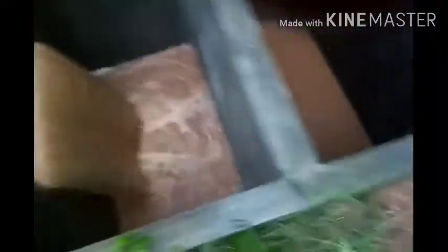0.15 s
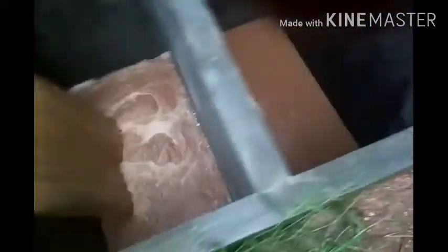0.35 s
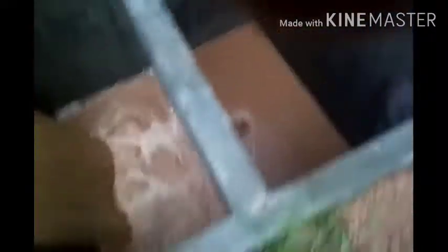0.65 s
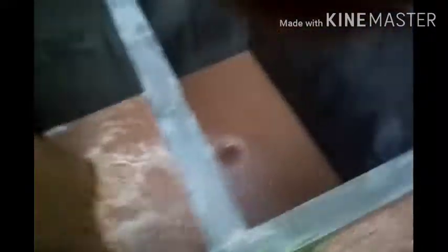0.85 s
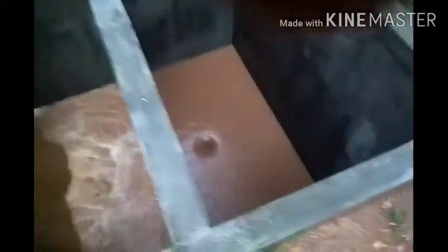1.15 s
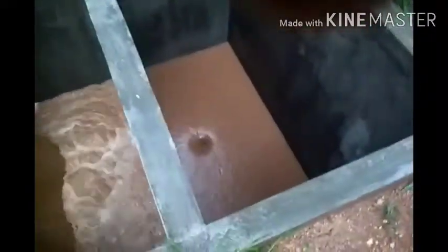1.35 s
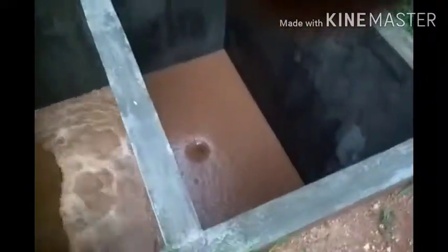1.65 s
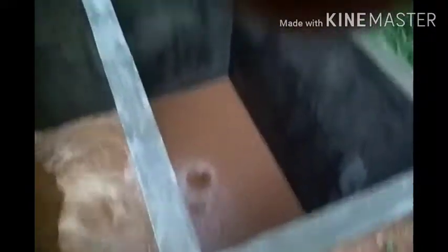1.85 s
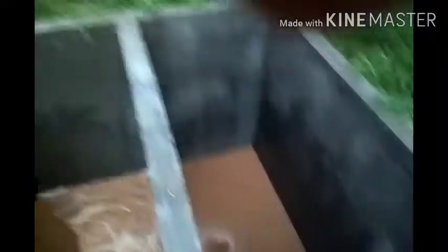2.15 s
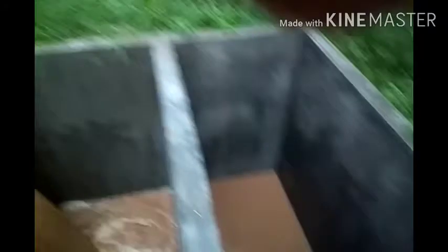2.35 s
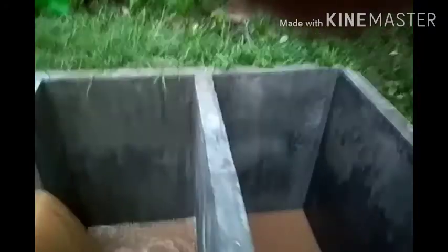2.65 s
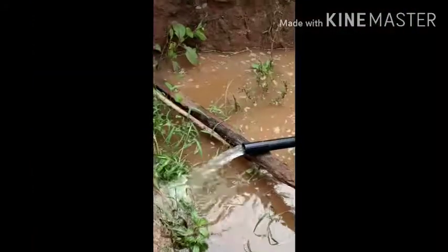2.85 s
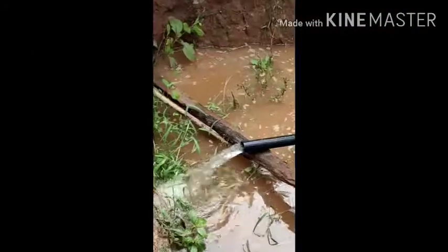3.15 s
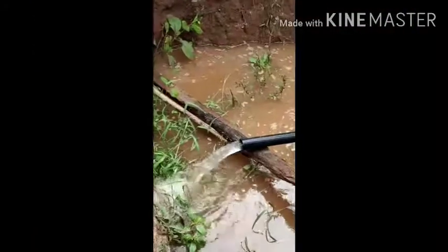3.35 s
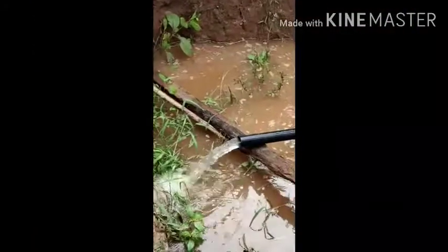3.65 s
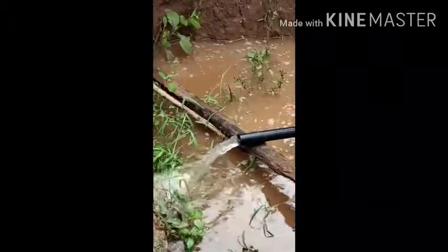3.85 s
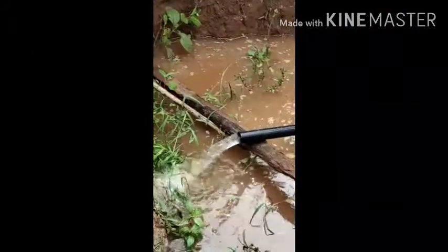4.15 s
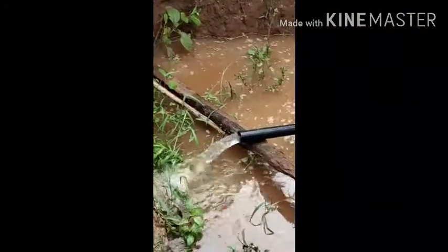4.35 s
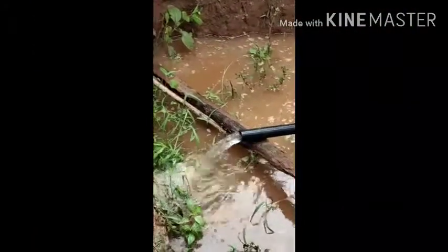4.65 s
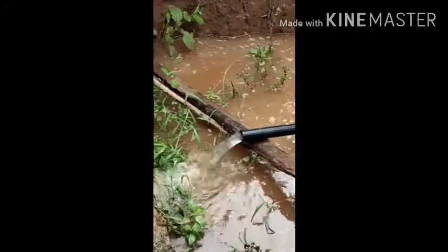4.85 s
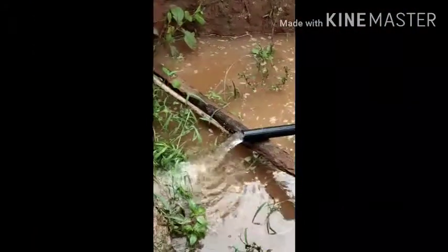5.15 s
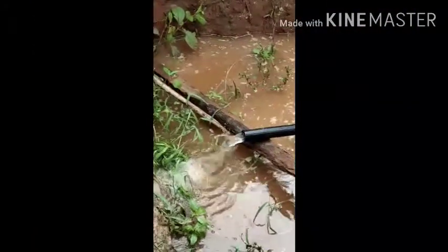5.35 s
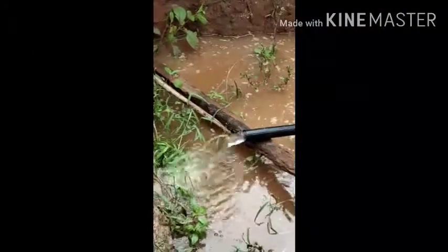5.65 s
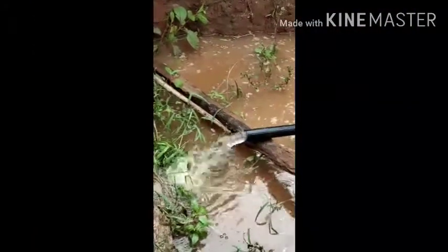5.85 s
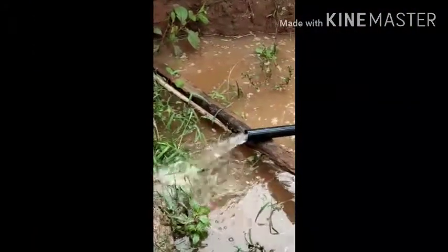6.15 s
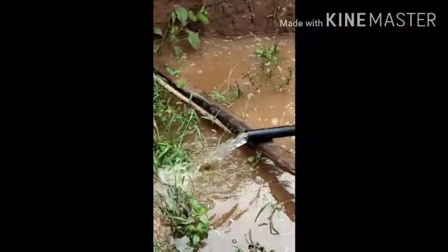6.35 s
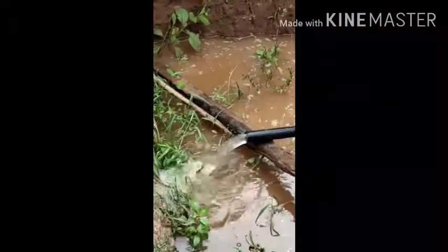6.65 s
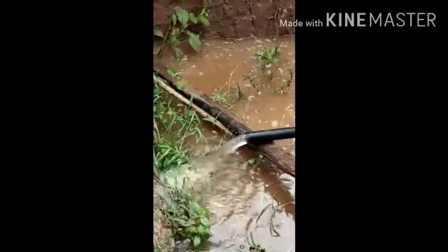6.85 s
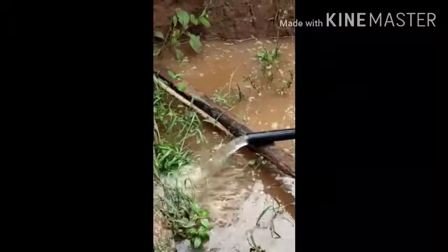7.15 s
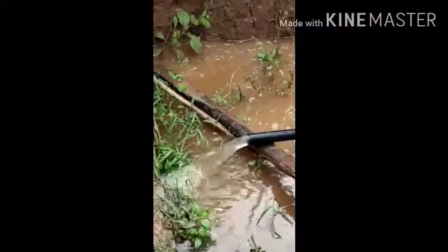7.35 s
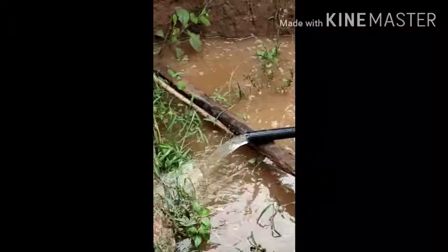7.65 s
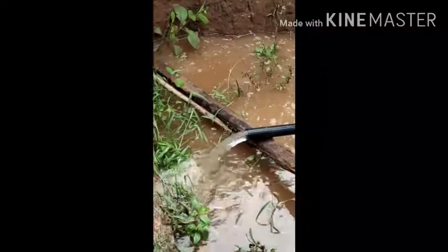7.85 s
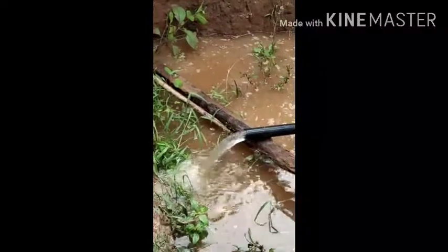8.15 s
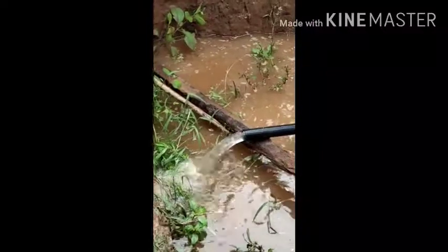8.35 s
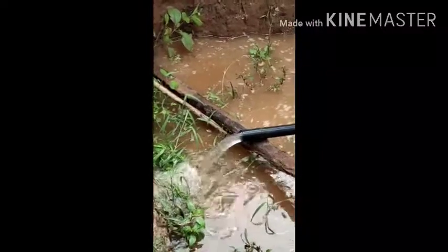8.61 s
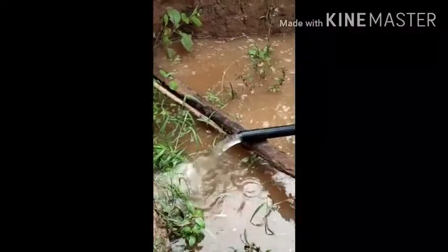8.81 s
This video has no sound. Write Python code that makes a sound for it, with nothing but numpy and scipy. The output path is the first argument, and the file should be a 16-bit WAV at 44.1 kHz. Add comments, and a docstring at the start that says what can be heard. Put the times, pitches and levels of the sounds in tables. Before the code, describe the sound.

Water gushes into a concrete tank, churning with dense bubbles, hollow gulps and wet slaps under a bright hiss of spray. A low boom swells briefly beneath it. After about three seconds the sound changes to a much quieter pipe pouring a thin, uneven stream into a puddle in an open ditch, babbling and spattering with small plops and a few deep gulps. The water sounds close throughout.

```python
"""First, muddy water gushes over a lip into a concrete tank: entrained air churns as dense ringing
bubbles under bright spray, and a low boom swells, strongest just after one second.
Near three seconds the scene fades to an open ditch, where a pipe pours a thin, uneven stream into
a puddle. From then on small bubbles babble and drops spatter, with plops, splashes and a few deep
gulps of trapped air. Both scenes lie a little to the right."""
import sys
import numpy as np
from scipy import signal
from scipy.fft import rfft, irfft, next_fast_len
from scipy.io import wavfile
from scipy.ndimage import map_coordinates

SR = 44100
rng = np.random.default_rng(int(sys.argv[2]) if len(sys.argv) > 2 else 0)


def int16_out(signal):
    """Quantize to a 16-bit WAV file."""
    q = np.round(np.clip(np.atleast_2d(signal).T, -1, 1) * 32767)
    wavfile.write(sys.argv[1], SR, q.astype(np.int16))


N = 396009
TIME = np.arange(N) / SR


def amp(db):
    """Amplitude ratio of a level in decibels."""
    return 10 ** (np.asarray(db) / 20)


def unit(x):
    """Normalisation to rms 1."""
    return x / np.sqrt(np.mean(x ** 2) + 1e-20)


def along(points, hz):
    """Interpolation of (frequency, value) points on a logarithmic frequency axis."""
    freqs, values = np.transpose(points)
    return np.interp(np.log(hz + 1), np.log(freqs + 1), values)


def curve(points):
    """Linear interpolation of (time, value) points at every sample."""
    return np.interp(TIME, *np.transpose(points))


def wobble(rate):
    """Smooth random modulation, rate knots a second."""
    return map_coordinates(rng.standard_normal(int(N * rate / SR) + 4), [TIME * rate])


def surges(rows, attack_s, release_s):
    """Trapezoidal envelopes: rows (time, duration, levels...) sum to one dB curve per level column."""
    rows = np.array(rows)
    shapes = [np.minimum((TIME - s) / attack_s, 1 - (TIME - s - hold) / release_s)
              for s, hold in rows[:, :2]]
    return rows[:, 2:].T @ np.clip(shapes, 0, 1)


def decaying(kicks, fall_s):
    """Exponential relaxation after each impulse."""
    return signal.lfilter([1], [1, -np.exp(-1 / (fall_s * SR))], kicks)


def filtered(x, response):
    """Linear filtering by a complex frequency response."""
    size = next_fast_len(N + 8192)
    return irfft(rfft(x, size) * response(np.fft.rfftfreq(size, 1 / SR)), size)[..., :N]


def coloured(x, spectrum):
    """Spectral shaping, normalised to rms 1."""
    return unit(filtered(x, lambda hz: amp(along(spectrum, hz))))


def noise():
    """Two uncorrelated white noises."""
    return rng.standard_normal((2, N))


def add(track, s, sound):
    """Superposition of a sound on a track at time s."""
    room = track[..., round(s * SR):][..., :sound.shape[-1]]
    room += sound[..., :room.shape[-1]]


def placed(pair, coherence, balance, lag):
    """Binaural cues: a common and a diffuse signal mix; the ears differ in level and delay."""
    angle = lambda hz: np.arccos(np.clip(along(coherence, hz), 0, 1)) / 2
    mid, side = filtered(pair, lambda hz: np.array([np.cos(angle(hz)), np.sin(angle(hz))]))
    half = np.array([[.5], [-.5]])
    delay_s = lambda hz: half * along(lag, hz) / 1000
    ears = lambda hz: amp(half * along(balance, hz)) * np.exp(-2j * np.pi * hz * delay_s(hz))
    return filtered(np.array([mid + side, mid - side]), ears)


def ring(cycle, life, rise, onset):
    """Damped bubble resonance: 60 dB down after life cycles, rising in pitch as it nears the surface."""
    age = cycle / life
    envelope = amp(-60 * age) * (1 - np.exp(-cycle / onset))
    return envelope * np.sin(2 * np.pi * cycle * (1 + rise * age / 2))


def bubbles(rate, low_hz, high_hz, life, spread_db, rise, samples):
    """Incoherent sum of bubble resonances: two independent swarms, rate bubbles a second in each."""
    when, pitch, loudness, lasting = rng.random((2 * int(rate * N / SR), 4)).T[..., None]
    hz = low_hz * (high_hz / low_hz) ** pitch
    strength = hz * amp(-spread_db * np.log(.02 + loudness))  # the factor hz flattens the spectrum
    waves = strength * ring(hz * np.arange(samples) / SR, life * 2 ** (2 * lasting - 1), rise, 0.15)
    places = (when * 2 * N).astype(int) + np.arange(samples)
    swarms = np.bincount(places.ravel(), waves.ravel(), 2 * N)
    return unit(swarms[:2 * N].reshape(2, N))


def droplets(rate, spread_db):
    """Shot noise: two independent showers of tiny impacts, rate a second in each."""
    hits = rng.random((2, N)) < rate / SR
    return unit(hits * noise() * amp(spread_db * np.clip(noise(), -2, 2)))


# Spectrum of the far background: (frequency [Hz], relative level [dB])
OUTDOOR_SPECTRUM = [(20, -33), (45, -19), (85, 7), (130, 6), (250, 0), (600, -37)]
def outdoors():
    """Ambient noise: a faint, steady low rumble from far away."""
    return amp(-66.5) * coloured(noise(), OUTDOOR_SPECTRUM)


# Spectrum of the tank's rumble: (frequency [Hz], relative level [dB])
RUMBLE_SPECTRUM = [(12, -38), (20, 16), (59, 16), (86, 23), (173, -8), (200, -3.5), (260, -36), (440, -120)]
# Its envelope: (time [s], level [dB])
RUMBLE_ENVELOPE = [(0, -55), (0.7, -53), (2.15, -52), (2.3, -66), (2.85, -62)]
def rumble():
    """Low-frequency noise of the tank under slow amplitude modulation."""
    return amp(curve(RUMBLE_ENVELOPE) + 1.2 * wobble(3.1)) * coloured(noise(), RUMBLE_SPECTRUM)


# Swells of the boom: (time [s], duration [s], level [dB])
BOOM_SWELLS = [(0.363, 0.044, -44.5), (1.09, 0.2, -35.5), (1.506, 0.052, -41), (1.745, 0.085, -44.5)]
# Dull thumps on top of them: (time [s], level [dB], frequency [Hz])
BOOM_THUMPS = [(1.257, -23.5, 146), (1.282, -30, 100), (1.372, -30, 45)]
def boom(hz=92, waver_hz=3.16, rest_db=-63, attack_s=0.035, fall_db_per_s=69):
    """A modulated low tone swells, holds and decays exponentially; damped thumps knock into it."""
    envelope = amp(rest_db + wobble(9.4))
    for s, hold, db in BOOM_SWELLS:
        attack = np.clip((TIME - s) / attack_s, 0, 1)
        fall_db = fall_db_per_s * np.maximum(TIME - s - hold, 0)
        envelope = np.maximum(envelope, attack * amp(db - fall_db))
    shudder = amp(1.1 * wobble(44.7))
    tone = shudder * np.sin(2 * np.pi * np.cumsum(hz + waver_hz * wobble(30.5)) / SR)
    flutter_spectrum = [(15, -8), (40, -7), (90, 4), (150, 10), (260, -53), (600, -90)]
    flutter = amp(-5 + 1.8 * wobble(35.9)) * coloured(noise()[0], flutter_spectrum)
    drone, t = envelope * (tone + flutter), np.arange(SR // 4) / SR
    for s, db, pitch in BOOM_THUMPS:
        add(drone, s, amp(db) * ring(pitch * t, life=11, rise=0.15, onset=0.8))
    return drone * amp([[2.5], [-3]])  # stronger on the left


# Spectrum of the spray: (frequency [Hz], relative level [dB])
SPRAY_SPECTRUM = [(1290, -9), (2200, -10), (3130, -7), (5130, -5), (6100, -10), (7010, -7), (8270, -8),
                  (9670, -1.5), (11200, -1.5), (14800, -3.5), (15700, -5)]
def spray(surge, level_db=-30):
    """Fine drops thrown up by the gush add incoherently to an even hiss."""
    mist = noise() + amp(-8.5) * droplets(rate=2000, spread_db=4)
    return amp(level_db + 0.63 * surge + 0.59 * wobble(90)) * coloured(mist, SPRAY_SPECTRUM)


# Heavy slaps of the gush: (time [s], level [dB], centre frequency [Hz], 60 dB decay time [s])
SHEET_SLAPS = [(0.23, -27, 800, 0.063), (0.925, -25, 1300, .09), (0.969, -21, 1830, .05),
               (1.405, -24, 1000, .05), (1.831, -21, 1750, .05), (1.862, -19.5, 1600, 0.071),
               (2.016, -22.5, 830, 0.036), (2.096, -24, 1200, .06), (2.241, -21.5, 1600, 0.056),
               (2.582, -22.5, 1050, 0.071), (2.626, -25, 1010, .04), (2.749, -26, 970, 0.037)]
def slaps(rise_s=0.002, width_octaves=0.55):
    """Impact entrainment: a lump smacks the pool; its cloud of like-sized bubbles gives band noise."""
    pair, t = np.zeros((2, N)), np.arange(SR // 5) / SR
    hz = np.fft.rfftfreq(len(t), 1 / SR) + 1
    for s, db, pitch, t60 in SHEET_SLAPS:
        band = np.exp(-.5 * (np.log2(hz / pitch) / width_octaves) ** 2)
        cloud = unit(irfft(rfft(rng.standard_normal(len(t))) * band, len(t)))
        add(pair[0], s, cloud * amp(db - 60 * t / t60) * (1 - np.exp(-t / rise_s)))
    return pair


# Spectrum of an air pocket tearing apart: (frequency [Hz], relative level [dB])
SPLUTTER_SPECTRUM = [(60, -3), (150, -3), (370, 4), (520, -14), (1200, -50)]
# Air pockets dragged under by the gush and by the jet: (time [s], level [dB], start frequency [Hz],
# final frequency [Hz], 60 dB decay time [s], glide time [s], relative splutter [dB])
TANK_POCKETS = [(0.775, -19.5, 354, 400, 0.11, 0.036, -10), (0.828, -22, 273, 302, .12, 0.026, -20),
                (0.888, -21, 240, 270, .15, .03, -20), (0.96, -18, 294, 330, 0.11, 0.027, -15),
                (1.075, -32, 247, 249, 0.61, 0.033, -22), (1.438, -29.5, 280, 288, 0.33, .03, -13),
                (1.585, -18, 396, 440, 0.15, 0.031, -17), (1.88, -23, 285, 297, 0.16, 0.027, -24),
                (2.128, -24, 260, 295, 0.28, 0.023, -18), (2.52, -21, 305, 336, 0.12, 0.038, -22),
                (2.665, -22, 283, 310, 0.11, 0.03, -20)]
DITCH_POCKETS = [(3.137, -42, 150, 219, 0.31, 0.028, -6), (3.708, -20.5, 200, 400, 0.041, 0.016, -3.5),
                 (3.822, -35, 130, 300, 0.076, 0.027, -2), (4.623, -39, 327, 400, 0.09, 0.042, -12),
                 (5.372, -41, 150, 176, 0.28, 0.016, -13), (5.44, -39.5, 151, 174, 0.22, 0.025, -10),
                 (5.615, -47, 159.5, 176, 0.41, .03, -14), (5.655, -34, 572, 875, 0.17, 0.03, -29),
                 (5.816, -30, 144, 330, 0.1, 0.032, -3), (6.002, -31.5, 140, 340, 0.15, 0.027, -10),
                 (6.094, -36, 250, 330, 0.062, 0.013, -8), (6.222, -33, 145, 432, 0.18, 0.0334, -9),
                 (6.372, -39, 372, 450, 0.11, .025, -16), (6.402, -39.5, 830, 810, .25, .03, -32),
                 (6.428, -43, 200, 342, 0.22, 0.021, -15), (6.473, -38, 780, 850, 0.083, .02, -30),
                 (6.615, -36, 325, 380, 0.074, 0.018, -13), (6.963, -41, 165, 200, 0.21, 0.027, -5),
                 (7.733, -36, 857, 1045, .12, 0.035, -30), (8.06, -37.5, 395, 470, 0.12, 0.04, -10),
                 (8.266, -35, 287, 400, 0.07, .03, -5), (8.29, -33.5, 300, 400, 0.073, .03, -7)]
def gulps(pockets, onset_s, waver, rough_db):
    """A big air pocket's resonance glides up as it surfaces; it shudders and splutters as it deforms."""
    pair, t = np.zeros((2, N)), np.arange(SR // 4) / SR
    modulators = wobble(190), wobble(110), coloured(noise()[0], SPLUTTER_SPECTRUM)
    for s, db, start_hz, final_hz, t60, glide_s, splutter_db in pockets:
        shudder, sway, tearing = (np.interp(s + t, TIME, x) for x in modulators)
        envelope = amp(db - 60 * t / t60 + rough_db * shudder) * (1 - np.exp(-t / onset_s))
        climb = 1 - np.exp(-(t / glide_s) ** 2)
        pitch = (start_hz + (final_hz - start_hz) * climb) * np.exp(waver * sway)
        tone = np.sin(2 * np.pi * np.cumsum(pitch) / SR)
        add(pair[0], s, envelope * (tone + amp(splutter_db) * tearing))
    low_cut = [(40, -24), (90, -11), (150, -1.35)]
    return filtered(pair, lambda hz: amp(along(low_cut, hz)))


# Air resonances between the concrete walls: (frequency [Hz], bandwidth [Hz], level [dB])
AIR_MODES = [(248.3, 15, -52.5), (287, 15, -50), (348, 57, -44), (552, 29, -55), (794, 7.3, -54),
             (1394, 14, -52)]
def tank_resonance(source, swell_rate=11):
    """Standing waves ring in the tank; each mode swells and sinks as the plunging sheet wanders."""
    ringing = np.zeros((2, N))
    for hz, width, db in AIR_MODES:
        resonator = lambda f: 1j * f * width / (hz * hz - f * f + 1j * f * width)
        ringing += amp(db + wobble(swell_rate)) * unit(filtered(source, resonator))
    return ringing


# Spectrum of the churning pool: (frequency [Hz], relative level [dB])
CHURN_SPECTRUM = [(76, -45), (130, -20), (178, -28), (247, -16.5), (410, -3.5), (520, -7), (612, -10),
                  (796, -9), (900, -8.5), (1250, -10.5), (1500, -13.5), (2050, -10.5), (3000, -31.5),
                  (3900, -63), (6600, -120)]
# The sheet thickens or thins as it plunges in: (time [s], duration [s], level change [dB])
SHEET_PLUNGES = [(0.07, 0.051, 2), (0.27, 0.033, 3), (0.46, 0.029, 2.5), (0.59, 0.088, 2), (0.81, 0.043, 3),
                 (0.92, 0.069, 1), (1.09, 0.045, 1), (1.57, 0.067, 1.5), (1.84, 0.037, 2.5),
                 (2.03, 0.22, 0.9), (2.35, 0.11, -1.5), (2.53, 0.071, 1), (2.72, 0.25, -0.5)]
def churn(surge, level_db=-33.5):
    """Air entrainment: the plunging sheet makes dense bubbles, which excite the tank's modes."""
    plunge_db, = surges(SHEET_PLUNGES, attack_s=0.019, release_s=0.065)
    foam = bubbles(1100, low_hz=191.8, high_hz=2903, life=31, spread_db=-1.25, rise=0.28, samples=1600)
    boil = foam + amp(5) * noise()
    direct = amp(level_db) * coloured(boil, CHURN_SPECTRUM)
    return amp(plunge_db + 0.23 * surge) * (direct + tank_resonance(boil))


# Likeness of the two ears at the tank: (frequency [Hz], coherence [0-1])
TANK_COHERENCE = [(100, 0.9), (400, 0.97), (600, 0.97), (850, 0.62), (1400, 0.2), (1900, 0.81), (2400, 0),
                  (10000, 0.06)]
# Interaural level difference: (frequency [Hz], left minus right [dB])
TANK_BALANCE = [(90, 2), (380, 0.5), (600, 2), (900, 3.5), (1400, 6), (1900, 0.5), (2700, -9), (4200, 0.5),
                (6500, -1), (9000, -3.5), (12300, -9.5), (14200, 1.5)]
# Interaural time difference: (frequency [Hz], left ear delay [ms])
TANK_DELAY = [(350, 0.076), (800, 0.15), (1500, 0.191)]
def tank(start_pan_db=0.34, drift_db_per_s=-0.2):
    """The sources of the gush superpose; a changing level difference draws them to the right."""
    surge = wobble(27.85)
    gush = churn(surge) + gulps(TANK_POCKETS, onset_s=0.0088, waver=0.057, rough_db=0.5)
    gush += spray(surge) + rumble() + slaps()
    pan = amp((start_pan_db + drift_db_per_s * TIME) * np.array([[.5], [-.5]]))
    return pan * placed(gush, TANK_COHERENCE, TANK_BALANCE, TANK_DELAY)


# Spectrum of large bubbles in the puddle: (frequency [Hz], relative level [dB])
SWIRL_SPECTRUM = [(65, -45), (110, -12.5), (172, -5.5), (242, -9), (338, -0.5), (375, -7), (438, -4),
                  (569, -30.5), (650, -1), (840, -17), (1430, -120)]
def swirl(gain_db, level_db=-57):
    """Resonant frequency falls as bubble size grows, so large pockets burble below the babble."""
    large = bubbles(130, low_hz=139.3, high_hz=626, life=15.2, spread_db=1.1, rise=0.42, samples=3500)
    return amp(level_db + gain_db) * coloured(large + amp(7) * noise(), SWIRL_SPECTRUM)


# Spectrum of drops hitting the puddle: (frequency [Hz], relative level [dB])
DROP_SPECTRUM = [(1470, -13.5), (2500, 2), (2780, -7.5), (3200, -6), (4380, -2.5), (5520, -9), (6150, -3.5),
                 (6900, -4.5), (8490, 0.5), (10200, -9.5), (12600, -11), (14800, -18), (15700, -45)]
def spatter(gain_db, thrown_db, impacts, level_db=-48.5, grain_share=0.75):
    """Drop impacts and the smallest bubbles crackle; in a slosh a smooth wash adds to them in power."""
    fizz = bubbles(710, low_hz=2614, high_hz=12850, life=145, spread_db=3, rise=0.22, samples=500)
    drops = impacts * (amp(1) * droplets(rate=1000, spread_db=2) + amp(2) * noise()) + fizz
    grain_gain = amp(grain_share * thrown_db)
    wash_gain = np.sqrt(np.maximum(amp(thrown_db) ** 2 - grain_gain ** 2, 0))
    crackle = grain_gain * coloured(drops, DROP_SPECTRUM)
    wash = wash_gain * coloured(noise(), DROP_SPECTRUM)
    return amp(level_db + gain_db) * (crackle + wash)


def stray_drops(level_db=-56, rate=32):
    """A Poisson process: drops fly clear of the jet at random and land with faint ticks."""
    hits = rng.random(N) < rate / SR
    return amp(level_db) * unit(decaying(hits, fall_s=0.0062) * coloured(noise(), DROP_SPECTRUM))


# Lumps of water hitting the puddle: (time [s], relative level [dB], 60 dB decay time [s])
PUDDLE_SPLASHES = [(3.3, -22, 0.013), (3.971, -21.5, 0.042), (4.243, -22, 0.041), (4.808, -22, 0.018),
                   (5.342, -22.5, 0.023), (5.631, -20, 0.096), (5.741, -18, 0.041), (5.75, -17.5, 0.066),
                   (5.966, -22, 0.03), (6.094, -28, 0.1), (6.319, -17, 0.043), (6.376, -24, 0.046),
                   (6.731, -21.5, 0.088), (6.79, -24.5, 0.11), (7.628, -25, 0.069), (8.226, -19.5, 0.034),
                   (8.811, -17.5, 0.03), (8.952, -17, 0.022)]
def splashes(gain_db=-14.5, rise_s=0.0012):
    """Each impact bursts into a shower of droplets that decays exponentially."""
    envelope, t = np.zeros(N), np.arange(SR // 5) / SR
    for s, db, t60 in PUDDLE_SPLASHES:
        add(envelope, s, amp(db + gain_db - 60 * t / t60) * (1 - np.exp(-t / rise_s)))
    return envelope * coloured(droplets(rate=13000, spread_db=-3.5), DROP_SPECTRUM)


# Close bubbles that plop, and tiny ones that tick: (time [s], relative level [dB], frequency [Hz])
PLOP_BUBBLES = [(3.02, -20.5, 1900), (3.051, -37, 1600), (3.134, -36, 1890), (3.186, -29, 1850),
                (3.303, -36, 1730), (3.353, -22.5, 1670), (3.369, -25, 1880), (3.432, -32, 1500),
                (3.561, -27.5, 1820), (3.626, -37, 900), (3.803, -26, 1950), (4.148, -32, 855),
                (4.2, -31, 1700), (4.432, -28, 1790), (4.534, -31, 1720), (4.699, -30, 1700),
                (4.713, -32, 1710), (4.825, -32, 2100), (4.892, -28, 1900), (5.02, -35, 1870),
                (5.075, -30, 1880), (5.297, -23, 2100), (5.457, -28, 1900), (5.471, -33.5, 1040),
                (5.483, -30, 1950), (5.539, -28.5, 1780), (5.632, -27, 1560), (5.753, -23.5, 1910),
                (6.165, -24, 2000), (6.322, -33, 920), (6.377, -20, 1920), (6.543, -29, 1800),
                (6.881, -37, 930), (6.93, -34, 1100), (7.056, -29, 1940), (7.2, -32, 1600),
                (7.258, -25, 2020), (7.337, -31, 2000), (7.379, -27, 2020), (7.39, -35, 2090),
                (7.735, -36, 920), (7.768, -29, 2200), (7.817, -29, 1590), (7.827, -28.5, 1660),
                (8.006, -34, 1780), (8.035, -27, 1570), (8.052, -30, 1850), (8.19, -29, 1950),
                (8.267, -28, 1920), (8.352, -29, 1770), (8.363, -29, 1870), (8.433, -29, 1750),
                (8.462, -29, 1900), (8.501, -23, 1300), (8.536, -25, 2150), (8.71, -26, 1840),
                (8.729, -29, 1730), (8.818, -25.5, 1780), (8.899, -34, 960)]
TICK_BUBBLES = [(3.301, -24, 8100), (3.475, -18.5, 8500), (4.03, -32, 6500), (4.185, -32, 6000),
                (4.2435, -24, 9400), (4.431, -26, 8600), (4.471, -30, 8500), (5.058, -21, 8600),
                (5.364, -25, 8600), (5.539, -33, 6700), (5.947, -28, 8300), (5.966, -34, 4100),
                (5.986, -33, 11000), (6.113, -26, 9500), (6.747, -30, 8200), (6.9475, -21, 8160),
                (8.8125, -29, 9170)]
def plops(rows, shed_db, life, gap_s, scatter, gain_db=4, rise=0.16, fade_db=4):
    """Pinch-off sets a bubble ringing; it sheds a short, fading train of bubbles of similar size."""
    pair, t = np.zeros((2, N)), np.arange(SR // 12) / SR
    for s, db, hz in rows:
        add(pair[0], s, amp(db + gain_db) * ring(hz * t, life, rise, onset=0.63))
        for k in range(5):
            pitch = hz * np.exp(scatter * rng.normal())
            delay = gap_s * (k + .5 + .5 * rng.random())
            shed = amp(db + shed_db - fade_db * k) * ring(pitch * t, life, rise, onset=0.49)
            add(pair[k % 2], s + delay, shed)  # common and diffuse in turn
    return pair


def plinks(gain_db, level_db=-52.5):
    """The jet's core pinches off bubbles of nearly one size, which resonate in a narrow band."""
    alike = bubbles(55, low_hz=1646, high_hz=2210, life=50, spread_db=3.5, rise=0.065, samples=1300)
    return amp(level_db + gain_db) * alike


# Spectrum of small bubbles in the puddle: (frequency [Hz], relative level [dB])
BABBLE_SPECTRUM = [(280, -40), (480, -9.5), (554, -14.5), (737, -12), (798, -2.5), (1040, -6), (1120, -3.5),
                   (1250, -6), (1840, -2), (2770, -14.5), (3200, -19), (4160, -51), (7040, -120)]
def babble(gain_db, impacts, level_db=-47.5):
    """Volume oscillation of bubbles a few millimetres wide, mixed with impact noise."""
    small = bubbles(470, low_hz=470, high_hz=3280, life=41, spread_db=1.5, rise=0.25, samples=1200)
    return amp(level_db + gain_db) * coloured(small + amp(1) * impacts * noise(), BABBLE_SPECTRUM)


# Strength of the stream, slowly easing: (time [s], relative level [dB])
PIPE_FLOW = [(2.95, 2), (3.6, 0.5), (3.9, 0), (4.8, 0.5), (5.2, -2.5), (5.6, 0.5), (6.6, -1), (7.6, -1.5),
             (8.98, -1.2)]
# Thicker slugs of water from the pipe: (time [s], duration [s], extra babble [dB], extra spatter [dB])
PIPE_SLOSHES = [(3.0, 0.23, 2.5, 0.5), (3.32, 0.028, 3, 4.5), (3.61, 0.19, 2.5, 3), (4.11, 0.093, 4, -0.5),
                (4.43, 0.36, 1, 1.5), (4.69, 0.19, 2, 0.5), (4.98, 0.044, 5.5, 1.5), (5.34, 0.15, 4, 2),
                (5.625, 0.15, 2.5, 4), (5.78, 0.16, 1, 0.5), (5.92, 0.095, -2, 4.5), (6.08, 0.11, 1.5, 5.5),
                (6.29, 0.12, 3, 6.5), (6.51, 0.095, 2.5, 7), (6.72, 0.051, 2, 8.5), (6.845, 0.12, 4.5, 6),
                (7.01, 0.04, 3, 0.5), (7.18, 0.16, 2, 1), (8.02, 0.2, 0, 0), (8.71, 0.027, 3.5, -2),
                (8.9, 0.093, 2.5, 3)]
def stream(impacts_per_s=64):
    """Jet break-up: water falls in lumps; each surge traps more bubbles and throws more spatter."""
    flow_db = curve(PIPE_FLOW)
    trapped_db, thrown_db = surges(PIPE_SLOSHES, attack_s=0.021, release_s=0.024)
    lumps = wobble(45)
    kicks = (rng.random(N) < impacts_per_s / SR) * rng.exponential(size=N)
    impacts = 1 + 0.16 * decaying(kicks, fall_s=0.014)
    return (babble(flow_db + trapped_db + 1.4 * lumps, impacts)
            + spatter(flow_db + 1.5 * lumps, thrown_db, impacts)
            + swirl(1.2 * flow_db + 0.59 * trapped_db)
            + plinks(flow_db))


# Likeness of the two ears at the ditch: (frequency [Hz], coherence [0-1])
DITCH_COHERENCE = [(350, .97), (600, 0.94), (1700, 0.32), (3000, 0.37), (6500, 0.065), (9000, 0.065)]
# Interaural level difference: (frequency [Hz], left minus right [dB])
DITCH_BALANCE = [(300, -0.5), (560, 5), (800, -1), (1300, 1), (1900, 6), (3000, 0), (4400, 2), (5500, 1.5),
                 (6700, 3), (8500, -6.5), (11000, 2), (12800, 12)]
# Interaural time difference: (frequency [Hz], left ear delay [ms])
DITCH_DELAY = [(300, 0.021), (520, 0.25), (1200, 0.014), (2000, 0.181)]
def ditch():
    """The sources in the puddle superpose on the far background, in the open air."""
    puddle = plops(PLOP_BUBBLES, shed_db=-2.5, life=18.3, gap_s=0.0037, scatter=0.11)
    puddle += plops(TICK_BUBBLES, shed_db=-1.5, life=39, gap_s=0.00056, scatter=0.125)
    puddle += stream() + stray_drops() + splashes()
    puddle += gulps(DITCH_POCKETS, onset_s=0.0077, waver=0.092, rough_db=3.5)
    return placed(puddle + outdoors(), DITCH_COHERENCE, DITCH_BALANCE, DITCH_DELAY)


def scene(fade_s=(2.868, 2.963)):
    """A crossfade: the tank gives way to the ditch."""
    near_tank = np.interp(TIME, fade_s, [1, 0])
    return (1 - near_tank) * ditch() + near_tank ** 2 * (tank() + boom())


def record(dry, top_hz=15800):
    """Band limiting: the phone keeps nothing above top_hz."""
    return filtered(dry, lambda hz: np.clip((top_hz - hz) / 200, 0, 1))


dry = scene()
out = record(dry)
int16_out(out)
```